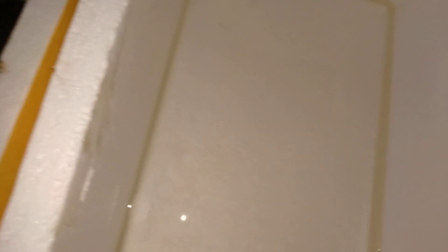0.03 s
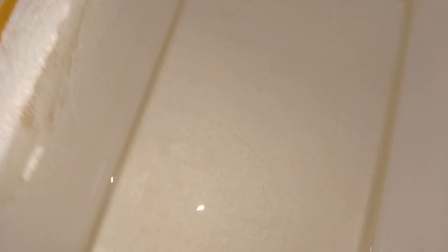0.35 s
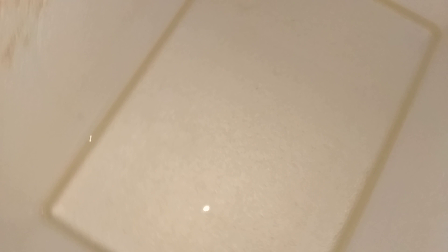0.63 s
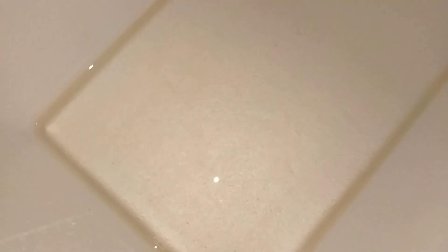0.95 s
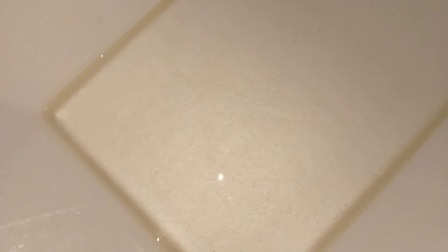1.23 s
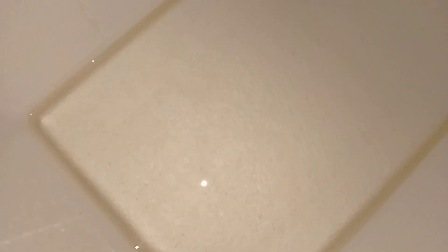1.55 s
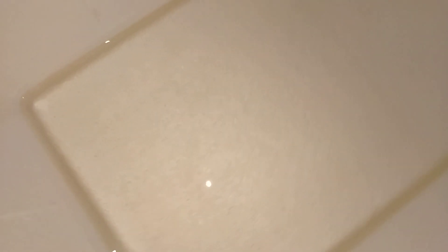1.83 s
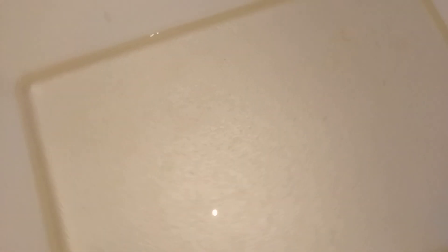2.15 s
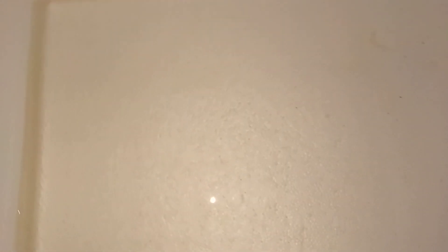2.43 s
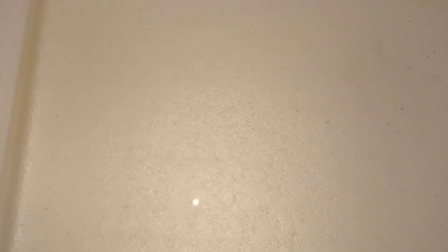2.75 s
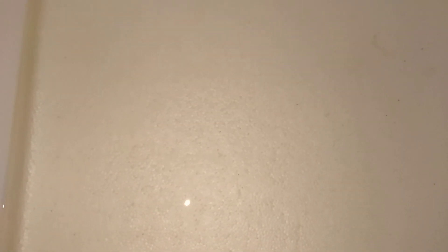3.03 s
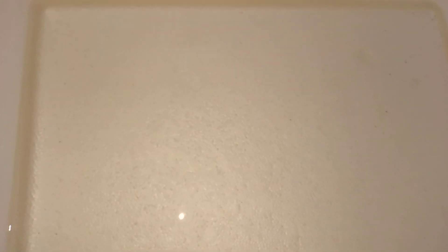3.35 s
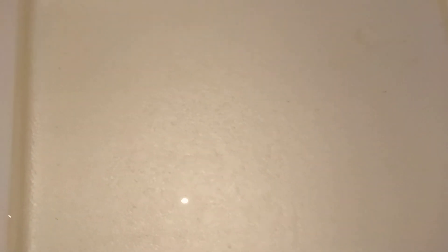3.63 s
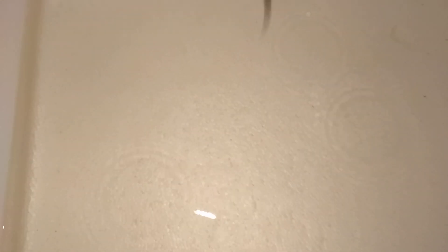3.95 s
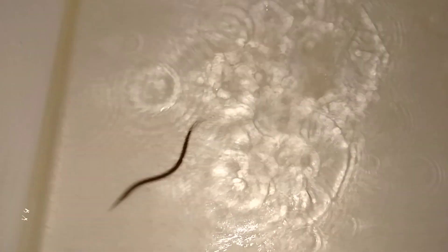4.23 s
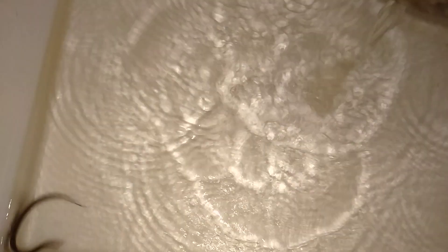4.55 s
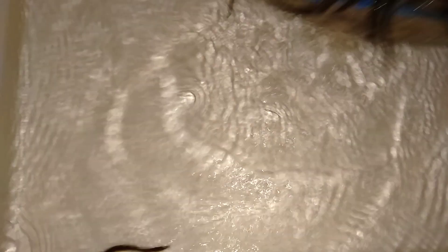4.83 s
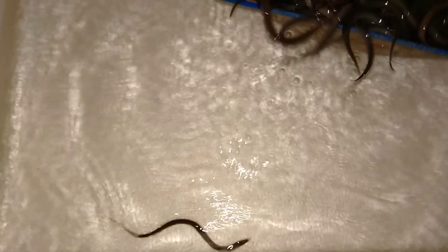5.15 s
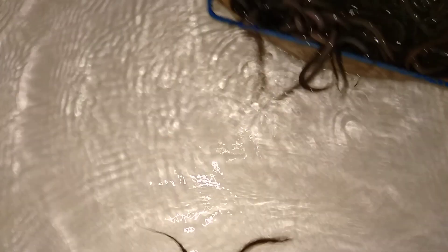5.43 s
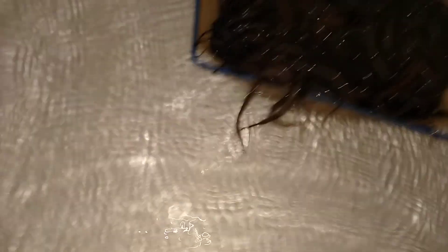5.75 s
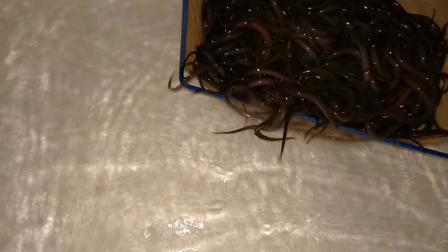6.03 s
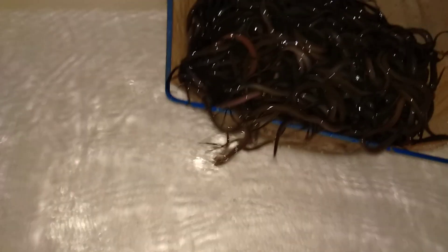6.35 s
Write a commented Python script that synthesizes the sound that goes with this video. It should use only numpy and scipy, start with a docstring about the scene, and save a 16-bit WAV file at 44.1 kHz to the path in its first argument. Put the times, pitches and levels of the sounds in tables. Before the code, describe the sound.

A low room hum runs throughout, with soft handling bumps on a close, hand-held microphone. For the first three seconds sleeves rub, the grip creaks around 1 to 1.3 seconds, and containers give a few light clicks. A crate scrapes in short shoves from about 2.2 to 2.6 seconds. At around 3.1 seconds drips and a thin trickle begin falling into a shallow water-filled box, with the first sharp splash near 3.8. From 4.1 to 4.9 seconds comes the loudest part: water and lumps of young eels pour in, slapping, plopping, gurgling and spraying while the box booms underneath. The stream dies away by about 5 seconds, and the crate knocks and rasps briefly until 5.3. Last drips follow, with faint wet ticks from the wriggling eels, a sleeve rub and a very faint crate squeak near 6 seconds, ending at about 6.4.

```python
"""Young eels and water pour from a wet crate into a shallow box, close up in a humming room.
The crate scrapes, then lets go a bubbling stream that swells and dies away. Lumps fall with it:
each slaps the surface, opens a cavity that breaks into bubbles and stirs up churn, while the box
booms underneath. Last drips fall and the eels tick wetly. Right at the hand-held microphone,
sleeves rub and the grip creaks."""
import sys
import numpy as np
from scipy import signal
from scipy.fft import rfft, irfft
from scipy.io import wavfile
from scipy.ndimage import uniform_filter1d

SR = 44100
rng = np.random.default_rng(int(sys.argv[2]) if len(sys.argv) > 2 else 0)


def wav_record(signal):
    """Record a signal, one row per channel, as 16-bit PCM in the file named by sys.argv[1]."""
    frames = np.transpose(np.atleast_2d(signal))
    bounded = np.clip(frames, -1, 1)
    # unit amplitude maps onto the largest positive 16-bit level
    quanta = np.round(bounded * 32767).astype(np.int16)
    wavfile.write(sys.argv[1], SR, quanta)


N = 282019
TIME, BINS = np.arange(N) / SR, np.fft.rfftfreq(N, 1 / SR)

# Levels are faders ahead of each layer's trim; pan is left minus right; t60 is a 60 dB decay.
# tone curves of the room, the friction and the water: f/Hz, level/dB
RUMBLE_EQ = [(20, -42), (40, -6), (55, 0), (72, 1.5), (100, -3), (138, -3.5), (190, -9.5), (260, -22),
             (500, -52)]
AIR_EQ = [(120, -58), (250, -10.5), (650, -10.5), (1200, -12.5), (2300, -11), (3600, -18), (6000, -21),
          (10000, -23.5), (16000, -26.5)]
SLEEVE_EQ = [(150, -27), (250, -5), (450, -8), (680, -1), (1000, -6), (1500, -4), (2400, -2.5), (3600, -6),
             (6250, -7), (8200, -7), (12000, -11), (16000, -16.5)]
RASP_EQ = [(200, -22), (500, -5), (900, 0), (1250, 1), (1600, -14), (2300, -1), (3200, -24), (9000, -34)]
SCRAPE_EQ = [(88, -36), (150, -33), (240, -8), (380, -5), (520, -8), (660, -2.5), (850, -2.5), (1200, -6),
             (1600, -4.5), (2360, -1), (3160, -14), (3840, -13), (16000, -25)]
SQUEAK_EQ = [(1500, -22), (1900, 12), (2100, 20), (2350, 11), (2900, -25)]
SLAP_EQ = [(300, 6), (1500, -17), (3500, -8), (6000, 0.5), (11500, 1.5), (16000, -3)]
SPLAT_EQ = [(120, 0), (300, -2), (700, 4.5), (1400, -3), (2200, -5), (3200, -18), (8000, -29)]
GURGLE_EQ = [(100, 15), (220, -2.5), (300, 0), (410, 3), (550, -1), (880, -2), (1120, -12.5), (1600, -9)]
BABBLE_EQ = [(600, -41), (1000, 0.5), (1800, 1), (2500, 2), (3200, -8.5), (5000, -10)]
SPRAY_EQ = [(1500, -8), (3200, 7.5), (5000, 6), (8000, 4.5), (12000, 3), (16000, -4)]
TINKLE_EQ = [(2500, -52), (3500, 15.5), (6000, 12), (11000, 4), (16000, 4)]

ROOM_DECAY = [(200, 0.62), (1000, 0.15), (4000, 0.37), (14000, 0.71)]  # the room's tail: f/Hz, t60/s
STEREO_LIKENESS = [(60, 0.99), (150, 0.97), (400, 0.7), (800, 0.46), (1500, 0), (3000, 0), (16000, 0)]  # how alike noise is in both ears: f/Hz, correlation
PORT_BALANCE = [(200, 0), (700, 0), (1300, 0.5), (2400, 4.5), (4400, 1), (8000, 0.5), (14000, -5.5)]  # the lean of the two microphone ports: f/Hz, pan/dB
HAND_JOLTS = [(0, 0.038, 0.51, -40.5), (0.212, 0.09, 1, -49.5), (1.9, 0.075, 0.3, -48.5),
              (2.316, 0.25, 0.3, -43), (2.853, 0.27, 0.39, -51), (3.794, 0.082, 0.56, -41),
              (5.266, 0.04, 0.53, -50.5), (5.774, 0.33, 1, -51), (6.203, 0.078, 0.2, -46)]  # jolts of hand and box: t/s, length/s, release t60/s, level/dB
CASE_MODES = [(500, -27, 0.015), (757, 8, 0.013), (1080, -1, 0.0087), (2010, 0.5, 0.0098),
              (2200, -4, 0.012)]  # the hollow case in the grip: base f/Hz, level/dB, base t60/s
# slips of the grip: t/s, level/dB, pitch factor, ring-time factor, relative rasp/dB
GRIP_SLIPS = [(0.9954, -37, 0.8, 0.95, -10), (1.007, -35, 0.89, 1.1, -11), (1.0239, -34, 0.82, .8, -12.5),
              (1.0523, -38, 0.8, 1, -16), (1.269, -44, 1.4, 2.2, 0), (1.289, -51, 1.1, 3.2, -14),
              (1.3, -42.5, 0.996, 3.2, -8), (1.313, -46, 1.38, 3, -8), (1.326, -41.5, 0.98, 2.4, -13)]
# sleeve rubs and crate shoves: t/s, length/s, release t60/s, body/dB, hiss/dB, pan/dB
SLEEVE_RUBS = [(-.3, 0.68, 0.83, -56, -61.5, 0.5), (.57, 0.083, 0.54, -56.5, -54.5, 0.5),
               (.95, 0.16, 0.53, -60.5, -62, -2), (1.55, 0.08, 0.11, -54, -48, -1),
               (1.89, 0.058, 0.25, -56.5, -53.5, -4), (2.08, 0.18, 0.87, -66, -53, 1),
               (2.655, 0.043, 0.097, -53, -45, -4), (2.72, 0.12, 0.99, -56, -50, -1.5),
               (2.86, .172, 0.095, -53, -46, -1.5), (3.05, 0.096, 0.45, -72, -59, -2),
               (5.91, 0.045, 0.43, -53.5, -51.5, -1.5)]
CRATE_SHOVES = [(2.185, 0.032, .1, -53, -46, 1), (2.222, 0.035, 0.041, -39.5, -43, 1.5),
                (2.265, 0.069, 0.43, -38.5, -40, -0.5), (2.347, 0.01, 0.35, -31.5, -49, -0.5),
                (2.375, 0.048, 0.14, -45, -41, 1), (2.43, .13, 0.2, -36, -43.5, -1.5),
                (5.087, 0.033, 0.07, -51, -43, 8), (5.117, 0.018, .02, -51, -51, 5),
                (5.228, 0.037, 1, -57, -52.5, 17), (5.265, 0.037, 0.2, -61, -49, -15)]
# containers knocking: t/s, clack/dB, pan/dB, t60/s, clack f/Hz, width/octaves, body/dB, body f/Hz
CONTAINER_KNOCKS = [(0.623, -29.5, -3, 0.034, 5470, 0.72, -40.5, 1700),
                    (0.645, -42, 0, .06, 3500, 1.1, -53, 1500),
                    (1.122, -31, 2, 0.046, 7460, 1.1, -45, 1800),
                    (1.271, -46.5, 1, 0.078, 2200, 2.4, -48, 1200),
                    (1.947, -31, -6, 0.031, 4600, 0.64, -44, 1500),
                    (2.225, -37, -2, 0.06, 4000, 0.76, -34.5, 1660),
                    (2.351, -40, 0, 0.06, 1800, 1.0, -31, 520),
                    (5.086, -34, 18, 0.082, 4370, 1.6, -46, 1500),
                    (5.157, -22, -1, 0.012, 2000, 1.5, -29.5, 744),
                    (5.2246, -28.5, 6, 0.014, 1400, 1.3, -33, 600),
                    (5.2443, -37, 9, .008, 1500, 2.4, -37.5, 800),
                    (5.257, -34, 4, 0.0055, 1380, 2.8, -40, 650)]
EEL_TICKS = [(5.48, -44.5), (5.601, -42), (5.666, -40), (5.755, -45.5), (6.127, -43), (6.282, -50)]  # wet ticks of wriggling eels: t/s, level/dB
BOX_MODES = [(55.5, -17, .4), (75, -2.5, 0.17), (102.6, 3.5, 0.23), (122.4, 1, 0.24), (209, -3, 0.17),
             (234.3, 1, 0.17)]  # the water-filled box: f/Hz, level/dB, t60/s
WATER_WEIGHT = [(3.5, -52.5), (3.76, -48), (3.848, -39), (4.082, -53.5), (4.106, -38), (4.284, -27.5),
                (4.446, -33), (4.592, -44), (4.626, -32.5), (4.744, -39), (4.772, -37), (5.15, -55.5)]  # the falling water's push on the box: t/s, level/dB
# clumps of like-sized bubbles in flung water: t/s, level/dB, swell/s, f/Hz, width/octaves, pan/dB
SPATTER_CLUMPS = [(3.234, -47, 0.012, 2130, .3, -3), (3.414, -40.5, 0.0045, 1620, 0.28, 3),
                  (3.477, -43.5, 0.0055, 1900, 0.18, -4), (3.598, -45, 0.0098, 2480, 0.23, 0),
                  (3.539, -47.5, 0.014, 10900, 0.59, 2), (3.626, -43.5, 0.0046, 3270, 0.28, -2),
                  (3.652, -41, 0.0051, 2960, 0.29, -3), (3.701, -34.5, 0.0032, 2130, 0.36, 2),
                  (3.803, -20, .0013, 10000, 0.71, 1), (3.805, -36.5, 0.004, 1000, 1, 0),
                  (3.861, -35, .002, 2500, .2, 0), (3.8825, -29, .0018, 1500, .6, 1),
                  (3.914, -35.5, 0.0047, 1450, .35, -1), (3.9644, -30, 0.0015, 1900, 0.62, -1),
                  (4.106, -35.5, 0.0011, 4900, 0.28, 2), (4.116, -31, .0013, 11500, .35, -2),
                  (4.174, -28, 0.00097, 13100, .3, -6), (4.182, -30, 0.0013, 13500, 0.22, -4),
                  (4.2228, -19.5, .0014, 11800, 0.54, 1), (4.199, -28, 0.0024, 3840, 0.42, 2),
                  (4.206, -27.5, 0.002, 2070, 0.3, 5), (4.22, -23, 0.0018, 1850, 0.25, 3),
                  (4.254, -24, 0.0016, 2100, 0.23, 2), (4.278, -28.5, 0.0035, 2370, 0.22, 5),
                  (4.293, -25, 0.003, 2740, 0.44, 4), (4.3615, -32, 0.0014, 9000, 0.5, 7),
                  (4.373, -29, 0.0024, 1740, 0.2, -3), (4.388, -27.5, 0.0013, 4000, 0.9, 4),
                  (4.399, -32, 0.0024, 9200, .15, -2), (4.433, -31, 0.0018, 10800, .2, -2),
                  (4.4395, -33, .0013, 6140, 0.12, 4), (4.463, -29, 0.0052, 1630, 0.27, -1),
                  (4.469, -39, 0.0026, 5870, .25, 8), (4.489, -39, .0015, 9500, 0.17, 0),
                  (4.499, -36, 0.0012, 7850, 0.18, 2), (4.5742, -32, 0.001, 5100, 0.5, 1),
                  (4.583, -36, .0016, 6500, 0.6, 0), (4.598, -39, 0.0024, 3050, 0.25, 2),
                  (4.617, -31.5, 0.0029, 3940, 0.36, 2), (4.663, -36, 0.0026, 2000, 0.45, -2),
                  (4.743, -35, 0.0028, 3400, 0.72, -2), (4.771, -32, 0.0012, 9500, .4, 0),
                  (4.81, -45, 0.0068, 9500, 0.67, -2), (4.873, -37, 0.0035, 2370, 0.12, -2),
                  (5.284, -47, 0.015, 9700, 0.43, -16), (5.719, -48.5, 0.0031, 2700, 0.26, -6)]
# single bubbles that ring above the rest: t/s, f/Hz, level/dB, ring/cycles, pan/dB
SOLO_BUBBLES = [(3.102, 1305, -38, 52, -1), (3.306, 738, -42, 90, 4), (3.43, 730, -42.5, 45, 1),
                (3.45, 665, -43, 110, 8), (3.478, 1365, -40, 160, 5), (3.52, 660, -42.5, 70, 3),
                (3.557, 469, -40.5, 100, -2), (3.628, 1295, -36, 40, 0), (3.83, 523, -32, 16, 2),
                (3.883, 296, -29, 5.3, 1), (3.92, 600, -32, 14, 0), (3.886, 1990, -20, 38, 0),
                (4.085, 298, -23, 16, -2), (4.098, 640, -23, 20, -2), (4.112, 508, -16.5, 65, 1),
                (4.122, 397, -20, 22, -1), (4.113, 256, -23, 13, 1), (4.15, 563, -20, 16, -2),
                (4.208, 1550, -11, 11, 7), (4.215, 1220, -15.5, 19, -6), (4.2285, 590, -6, 8.5, 7),
                (4.229, 272, -9.5, 13, 2), (4.244, 223, -18, 17, -3), (4.32, 134, -16, 6.1, 0),
                (4.3305, 664, -15.5, 8.6, -7), (4.398, 620, -14, 6.9, 3), (4.477, 1240, -15, 12, -4),
                (4.532, 723, -19, 22, -3), (4.56, 390, -19.5, 19, 1), (4.619, 546, -24.5, 30, -1),
                (4.696, 630, -10, 6.4, 0), (4.699, 406, -14, 4.6, 7), (4.707, 397.4, -28.5, 85, 0),
                (4.9255, 870, -21, 21, -2), (4.95, 543, -35, 22, 0), (5.365, 1300, -38.5, 29, 12),
                (5.477, 2000, -36, 9.4, -2), (5.849, 634, -41.5, 18, -2)]
# lumps hitting the water: t/s, crackle/dB, splat/dB, cavity f/Hz, cavity/dB, pan/dB
FALLING_LUMPS = [(3.717, -57, -32, 402, -28.5, 1), (3.8036, -14.5, -24.5, 557, -22.5, -0.5),
                 (3.882, -52, -20.5, 900, -24.5, -11), (3.917, -40, -30, 1400, -36, 0),
                 (3.9653, -37, -35, 1900, -33, -4), (4.077, -37, -32, 514, -26, -2),
                 (4.089, -25.5, -22, 670, -13.5, 2), (4.113, -31, -33, 446, -13, 0),
                 (4.147, -28, -44, 490, -37, -10), (4.1738, -14, -26.5, 406, -39, 2),
                 (4.198, -20, -31, 860, -40, 4), (4.2048, -17, -16, 810, -15, -3),
                 (4.224, -12.5, -40, 780, -2.5, -5), (4.254, -24, -17, 507, -41, 5),
                 (4.33, -24, -22, 790, -18, 4), (4.388, -24, -18.5, 322, -13.5, -1),
                 (4.436, -30, -24, 410, -23, 1), (4.49, -32, -25, 760, -12.5, 3),
                 (4.538, -44, -24.5, 757, -16.5, -2), (4.58, -29, -31, 396, -21, 2),
                 (4.6695, -19.5, -19.5, 790, -16, -4), (4.69, -50, -40, 606, -23, -1),
                 (4.713, -23.5, -28.5, 656, -23, 0), (4.744, -21.5, -27.5, 600, -41, 0),
                 (4.789, -25, -47, 496, -44, -6), (4.918, -31, -31, 870, -25, 3)]
# the bubbles every cavity breaks into: delay/s, pitch factor, relative level/dB, ring/cycles
CAVITY_BREAKUP = [(.0052, 0.98, 1, 10.2), (.0052, .74, -7.5, 12.5), (.007, 0.519, -10.5, 13),
                  (.007, 0.35, -7.5, 9.2)]
# brief dips in the spray's hiss that also soften the bubbling: t/s, length/s, level/dB
SPRAY_DIPS = [(4.15, .013, -4), (4.188, .008, -5), (4.21, .011, -6), (4.224, .018, -13), (4.335, 0.034, -8),
              (4.557, 0.022, -18), (4.635, .027, -5), (4.682, 0.021, -8), (4.719, 0.015, -7),
              (4.83, 0.022, -0.5)]
STREAM_LEVELS = [(3.19, -72, -53, -65), (3.269, -55, -36.5, -46), (3.39, -57, -47, -49.5),
                 (3.52, -44, -43, -49), (3.66, -49, -42, -47.5), (3.86, -45, -34.5, -39.5),
                 (4.07, -42, -38.5, -46), (4.17, -33.5, -36, -36.5), (4.28, -31, -30.5, -36),
                 (4.48, -29, -27.5, -38), (4.6, -33, -36, -39.5), (4.78, -31.5, -47, -42.5),
                 (4.9, -41.5, -43, -50), (5.0, -39.5, -81, -56), (5.07, -57, -47, -55.5),
                 (5.5, -68, -66, -60), (6.39, -63.5, -102, -64.5)]  # the steady stream from the crate: t/s, gurgle/dB, babble/dB, spray/dB


def gain_of(db):
    """Decibels to amplitude."""
    return 10 ** (np.asarray(db) / 20)


def unit_rms(x):
    """Scales to rms 1."""
    return x / np.sqrt(np.mean(x ** 2) + 1e-20)


def curve_at(points, hz):
    """Reads a curve on a log-frequency axis."""
    f, value = np.transpose(points)
    return np.interp(np.log(hz + 1), np.log(f + 1), value)


def fader(times, db):
    """A level ride as a gain, fading to silence outside its span."""
    inside = (TIME >= times[0]) * (TIME <= times[-1])
    return uniform_filter1d(gain_of(np.interp(TIME, times, db)) * inside, size=300)


def panned(db):
    """Constant-power left and right gains."""
    pair = gain_of(np.array([np.atleast_1d(db), -np.atleast_1d(db)]) / 2)
    return pair / np.sqrt(np.mean(pair ** 2, axis=0))


def add(mix, start, sound):
    """Mixes a sound in at a start time in seconds."""
    part = mix[:, max(round(start * SR), 0):][:, :sound.shape[1]]
    part += sound[:, :part.shape[1]]


def coloured(x, eq):
    """Applies a tone curve, keeping the power of white noise."""
    return irfft(rfft(x) * unit_rms(gain_of(curve_at(eq, BINS))), N)


def noise(eq, lo_hz=0, hi_hz=SR):
    """Coloured stereo noise with soft band edges, whose bass is alike in both ears."""
    left, other = rfft(rng.standard_normal((2, N)))
    likeness = np.clip(curve_at(STEREO_LIKENESS, BINS), -1, 1)
    right = likeness * left + np.sqrt(1 - likeness ** 2) * other
    edges = np.sqrt((1 + (lo_hz / (BINS + 1)) ** 12) * (1 + (BINS / hi_hz) ** 12))
    return unit_rms(irfft(np.array([left, right]) * gain_of(curve_at(eq, BINS)) / edges, N))


def flutter(hz, depth_db):
    """A random gain that wanders at rates up to about hz."""
    wander = irfft(rfft(rng.standard_normal(N)) / (1 + (BINS / hz) ** 4), N)
    return unit_rms(gain_of(depth_db * unit_rms(wander)))


def patchy(x, depth_db, bins, frames, window=512):
    """Grains come in clumps: random patches, bins wide and frames long, swell and fade."""
    framing = dict(nperseg=window, noverlap=window - window // 4)
    spectra = signal.stft(x, SR, **framing)[2]
    clumps = uniform_filter1d(rng.standard_normal(spectra.shape[1:]), bins, axis=0)
    clumps = unit_rms(uniform_filter1d(clumps, frames, axis=1))
    return unit_rms(signal.istft(spectra * gain_of(depth_db * clumps), SR, **framing)[1][:, :N])


def stroke(start, length, release_t60, swell_db=4.5, attack_s=0.0028):
    """A push sets in, swells as the pressure grows, then lets go."""
    t = np.maximum(TIME - start, 0)
    rise_db = swell_db * np.minimum(t / length - 1, 0)
    fall_db = 60 * np.maximum(t - length, 0) / release_t60
    return np.minimum(t / attack_s, 1) * gain_of(rise_db - fall_db)


def ring(modes):
    """A struck object's dying modes."""
    t = np.arange(SR // 2) / SR
    return sum(gain_of(db - 60 * t / t60) * np.sin(2 * np.pi * hz * t) for hz, db, t60 in modes)


def grit(hz, octaves):
    """A short stretch of noise in one band, partly alike in both ears."""
    size = SR // 6
    band = np.exp(-.5 * (np.log2((np.fft.rfftfreq(size, 1 / SR) + 1) / hz) / octaves) ** 2)
    hiss = unit_rms(irfft(rfft(rng.standard_normal((3, size))) * band, size))
    return (hiss[:2] + hiss[2]) / np.sqrt(2)


def tap(db, t60, hz, octaves):
    """A short dying rattle in one band."""
    return gain_of(db - 60 * np.arange(SR // 6) / SR / t60) * grit(hz, octaves)


def room_tone(air_db=-58, hum_db=-53):
    """The bed: a steady low hum, a rumble at each jolt, and faint air."""
    jolt_power = sum((gain_of(db) * stroke(*timing)) ** 2 for *timing, db in HAND_JOLTS)
    rumble = noise(RUMBLE_EQ) * np.sqrt(gain_of(hum_db) ** 2 + jolt_power)
    return rumble + gain_of(air_db) * noise(AIR_EQ)


def reverb(x, walls_db=-8, walls_t60=0.054, tail_db=-14):
    """Adds quick echoes between the box walls, then the room's short tail."""
    age = np.arange(SR // 2) / SR
    echoes = rng.standard_normal((2, len(age))) * (rng.random((2, len(age))) < .06)
    walls = echoes * (age > .0015) * gain_of(-60 * age / walls_t60)
    hz, t, spectra = signal.stft(echoes * (age > .012), SR, nperseg=256)
    decay = gain_of(-60 * t / curve_at(ROOM_DECAY, hz)[:, None])
    tail = signal.istft(spectra * decay, SR, nperseg=256)[1][:, :len(age)]
    response = gain_of(walls_db) * unit_rms(walls) + gain_of(tail_db) * unit_rms(tail)
    return x + signal.fftconvolve(x, response / np.sqrt(len(age)), axes=1)[:, :N]


def grip_creaks(case_db=-6, pan_db=2.2, rasp_t60=0.084):
    """The grip slips in jerks that ring the hollow case, longer when held loosely, and leave a rasp."""
    case, rasp, t = np.zeros((2, N)), np.zeros((2, N)), np.arange(SR // 10) / SR
    for start, db, pitch, lasts, rasp_db in GRIP_SLIPS:
        modes = [(hz * pitch, mode_db, t60 * lasts) for hz, mode_db, t60 in CASE_MODES]
        add(case, start, gain_of(db + case_db) * panned(pan_db) * ring(modes))
        add(rasp, start, np.ones((2, 1)) * gain_of(db + rasp_db - 60 * t / rasp_t60))
    return case + rasp * noise(RASP_EQ)


def friction(strokes, eq, body_db, hiss_db, catch_hz, catch_db, swell_db):
    """Sliding surfaces: a dull body and a grainy hiss that brightens with pressure catch together."""
    split_hz, fizz_hz, firm_db, brighten = 3000, 8000, -47, 0.52
    body = patchy(noise(eq, hi_hz=split_hz), depth_db=2.5, bins=8, frames=2, window=1024)
    hiss = patchy(noise(eq, lo_hz=split_hz), depth_db=2.4, bins=14, frames=2) * flutter(900, 1.4)
    fizz = irfft(rfft(hiss) / (1 + (fizz_hz / (BINS + 1)) ** 4), N)
    out = np.zeros((2, N))
    for start, length, release, low_db, high_db, pan_db in strokes:
        push = stroke(start, length, release, swell_db)
        pressure = push * gain_of(high_db - firm_db)
        top = hiss + fizz * (pressure ** brighten - 1)
        slide = body * gain_of(low_db + body_db) + top * gain_of(high_db + hiss_db)
        out += slide * push * panned(pan_db)
    return out * flutter(catch_hz, catch_db)


def sleeve_rustle():
    """Sleeves and hands rub in soft strokes."""
    return friction(SLEEVE_RUBS, SLEEVE_EQ, body_db=4.5, hiss_db=1.5,
                    catch_hz=196, catch_db=-1, swell_db=7.5)


def crate_scrape():
    """The crate is dragged along in short shoves."""
    return friction(CRATE_SHOVES, SCRAPE_EQ, body_db=-1, hiss_db=0,
                    catch_hz=140, catch_db=1.2, swell_db=10.5)


def crate_judder(start=5.119, length=0.028, per_s=300, slip_db=-34, growth_db=5, pan_db=4):
    """The crate sticks and slips on the rim of the box: a dry rasp of uneven, growing rattles."""
    out = np.zeros((2, N))
    for t in np.arange(0, length, 1 / per_s):
        late, extra = 0.18 * rng.standard_normal(2)
        size = (1 + extra) * gain_of(slip_db + growth_db * (t / length - .5))
        add(out, start + t + late / per_s, size * tap(0, t60=0.007, hz=1100, octaves=0.9))
    return out * panned(pan_db)


def crate_squeak(level_db=-60):
    """The crate squeaks faintly and roughly, dead centre, as it slides to rest."""
    rough = flutter(hz=90, depth_db=3)
    push = stroke(start=5.88, length=.26, release_t60=0.3, swell_db=4)
    return noise(SQUEAK_EQ)[:1] * rough * push * gain_of(level_db)


def knocks(clack_db=-5, body_db=-3.5, body_lasts=2.05):
    """The containers clack over a hollow body that rings longer."""
    out = np.zeros((2, N))
    for start, db, pan_db, t60, hz, octaves, hollow_db, body_hz in CONTAINER_KNOCKS:
        body = tap(hollow_db + body_db, t60 * body_lasts, body_hz, octaves=0.87)
        clack = tap(db + clack_db, t60, hz, octaves)
        add(out, start, panned(pan_db) * (clack + body))
    return out


def eel_ticks(trim_db=-5):
    """Wriggling eels tick thinly in the top treble."""
    out = np.zeros((2, N))
    for start, db in EEL_TICKS:
        add(out, start, tap(db + trim_db, t60=0.024, hz=11800, octaves=0.35))
    return out


def box_boom(trim_db=0.5, low_cut_hz=50):
    """The weight of the falling water shakes the box's low modes."""
    push = rng.standard_normal(N) * fader(*np.transpose(WATER_WEIGHT)) * gain_of(trim_db)
    box = signal.sosfilt(signal.butter(4, low_cut_hz, "high", fs=SR, output="sos"), ring(BOX_MODES))
    return signal.oaconvolve(push, box / np.linalg.norm(box))[:N]


def spatters():
    """Flung water shatters into clumps of bubbles that swell fast and die: a wet chirp or crackle."""
    out, t = np.zeros((2, N)), np.arange(SR // 6) / SR
    for start, db, swell_s, hz, octaves, pan_db in SPATTER_CLUMPS:
        swell = t / swell_s * np.exp(1 - t / swell_s)
        add(out, start, gain_of(db) * panned(pan_db) * swell * grit(hz, octaves))
    return out


def slaps(crackle_db=-5, splat_db=-6, splat_t60=0.046, burst_s=0.0014):
    """Each lump bursts on the surface: a bright crackle of its own colour over a dull splat."""
    crackle, splat, t = np.zeros((2, N)), np.zeros((2, N)), np.arange(SR // 15) / SR
    burst = t / burst_s * np.exp(1 - t / burst_s)
    for start, bright_db, dull_db, _, _, pan_db in FALLING_LUMPS:
        white = rng.standard_normal((3, len(t)))
        wide, narrow = white[:2], (white[:2] + white[2]) / np.sqrt(2)
        size = gain_of(bright_db + crackle_db) * panned(pan_db)
        add(crackle, start - burst_s / 2, size * burst * wide)
        add(splat, start, gain_of(dull_db + splat_db - 60 * t / splat_t60) * narrow)
    grainy = patchy(coloured(crackle, SLAP_EQ), depth_db=4, bins=5, frames=12, window=128)
    return grainy * np.std(crackle) + coloured(splat, SPLAT_EQ)


def bubble(hz, t60, rise=0.013, max_lag_s=0.000452):
    """A bubble rings and climbs in pitch as it nears the surface; it reaches one ear first."""
    t = np.maximum(np.arange(int(t60 * SR) + 64) / SR - rng.uniform(0, max_lag_s, (2, 1)), 0)
    turns = hz * t * (1 + rise * (t / t60 / 2 - .15))
    return gain_of(-60 * t / t60) * (1 - np.exp(-2 * hz * t)) * np.sin(2 * np.pi * turns)


def plops(cavity_db=-1.5):
    """Cavities break into bubbles and drops ring single ones; each sheds a weaker one just after."""
    out = np.zeros((2, N))
    bubbles = [(start + delay, hz * share, db + part_db + cavity_db, cycles, pan_db)
               for start, _, _, hz, db, pan_db in FALLING_LUMPS
               for delay, share, part_db, cycles in CAVITY_BREAKUP]
    for start, hz, db, cycles, pan_db in [*bubbles, *SOLO_BUBBLES]:
        size, t60 = gain_of(db) * panned(pan_db), cycles / hz
        add(out, start, size * bubble(hz, t60))
        shed_at, shed_hz = start + rng.uniform(.004, .012), hz * rng.uniform(.85, 1.2)
        add(out, shed_at, .4 * size * bubble(shed_hz, t60))
    return out


def swarm(lo_hz, hi_hz, per_s, cycles, spread_db, count=48, scatter_db=5.5):
    """A crowd of bubbles forms all over the box, a few much louder than the rest."""
    out, voices = np.zeros((2, N)), []
    for hz in np.geomspace(lo_hz, hi_hz, count):
        t60 = cycles * rng.uniform(1.0, 1.67) / hz
        voices.append(np.sqrt(hz) * bubble(hz, t60) * rng.choice([-1, 1]))
    size = gain_of(spread_db * np.minimum(rng.exponential(1, N), 3))
    span = hi_hz / lo_hz
    pick = (count * np.log1p(rng.random(N) * (span - 1)) / np.log(span)).astype(int)  # even in Hz
    born = (rng.random(N) < per_s / SR) & (TIME > STREAM_LEVELS[0][0])
    place = panned(scatter_db * rng.standard_normal(N))
    for i in np.flatnonzero(born):
        add(out, TIME[i], size[i] * place[:, i, None] * voices[pick[i] % count])
    return out


def churn(stream_db, lumps_db, rise_s=0.0017, t60=0.32):
    """How hard the water is stirred: the steady stream plus a dying burst after each lump."""
    power = fader(np.transpose(STREAM_LEVELS)[0], stream_db)[None] ** 2
    t = np.arange(SR // 2) / SR
    burst = np.minimum(t / rise_s, 1) * gain_of(-60 * t / t60)
    for (start, *_), db in zip(FALLING_LUMPS, lumps_db):
        add(power, start, (gain_of(db) * burst[None]) ** 2)
    return np.sqrt(power[0])


def bubbling(deep_drive, mid_drive, gurgle_db=-4.5, babble_db=-8, babble_pan_db=2):
    """Trapped air rings: large bubbles gurgle, smaller ones babble."""
    large = swarm(190, 1500, per_s=1300, cycles=8, spread_db=2.6)
    small = swarm(959, 3480, per_s=800, cycles=21.5, spread_db=2.4)
    gurgle = unit_rms(coloured(large, GURGLE_EQ)) * deep_drive * gain_of(gurgle_db)
    babble = unit_rms(coloured(small, BABBLE_EQ)) * mid_drive * gain_of(babble_db)
    return gurgle + babble * panned(babble_pan_db)


def spray(drive, full_db=-37, rustle_db=-1.5, crackle_db=2, tinkle_db=-3, pan_db=-3):
    """Thin spray rustles softly; heavy spray breaks into crackling droplets and tinkling bubbles."""
    heavy = np.clip(drive / gain_of(full_db), 0, 1)
    mist = coloured(swarm(2650, 14400, per_s=7000, cycles=2.2, spread_db=0.66), SPRAY_EQ)
    rustle = patchy(mist, depth_db=3.2, bins=9, frames=4) * np.sqrt(1 - heavy ** 2) * gain_of(rustle_db)
    droplets = noise(SPRAY_EQ) * flutter(hz=350, depth_db=2.3)
    crackle = patchy(droplets, depth_db=4, bins=5, frames=5, window=256) * heavy * gain_of(crackle_db)
    tiny = swarm(2900, 15500, per_s=1200, cycles=80, spread_db=2.6, count=160)
    tinkle = unit_rms(coloured(tiny, TINKLE_EQ)) * heavy ** 2 * gain_of(tinkle_db)
    return ((rustle + crackle) * flutter(hz=31, depth_db=2.7) + tinkle) * drive * panned(pan_db)


def pour(lull_from_s=3.985, lull_to_s=4.085, lull_db=-14):
    """The stream bubbles and sprays; the hiss dips briefly at times, and the bubbling softens with it."""
    _, gurgle_db, babble_db, spray_db = np.transpose(STREAM_LEVELS)
    _, _, splat_db, _, cavity_db, _ = np.transpose(FALLING_LUMPS)
    deep_drive = churn(gurgle_db, cavity_db - 15)  # cavities feed the large bubbles, splats the rest
    mid_drive = churn(babble_db, splat_db - 17)
    fine_drive = churn(spray_db, splat_db - 22)
    # the stream thins to spray just before the mass of eels slides out
    lull = uniform_filter1d(gain_of(lull_db * (TIME > lull_from_s) * (TIME < lull_to_s)), size=600)
    dip_db = sum(db * (TIME > start) * (TIME < start + length) for start, length, db in SPRAY_DIPS)
    dips = uniform_filter1d(gain_of(dip_db), size=200)
    bubbles = bubbling(deep_drive, mid_drive) * lull * np.sqrt(dips)
    return (bubbles + spray(fine_drive) * dips) / np.sqrt(2)


def scene():
    """Water, eels and crate play through the reverb; boom, handling and room tone stay dry."""
    crate = crate_scrape() + crate_judder() + crate_squeak()
    sleeves = sleeve_rustle()
    low_cut = signal.butter(2, 130, "high", fs=SR, output="sos")  # bubbles radiate little bass
    water = signal.sosfilt(low_cut, pour() + plops() + slaps() + spatters())
    action = reverb(water + knocks() + eel_ticks() + crate)
    return action + box_boom() + sleeves + grip_creaks() + room_tone()


def record(dry, top_hz=16150):
    """The microphone's two ports tilt each band left or right; a steep high cut follows."""
    heard = irfft(rfft(dry) * panned(curve_at(PORT_BALANCE, BINS)), N)
    high_cut = signal.firwin(401, top_hz, window=("kaiser", 9), fs=SR)
    return signal.oaconvolve(heard, high_cut[None], "same")


dry = scene()
out = record(dry)
wav_record(out)
```